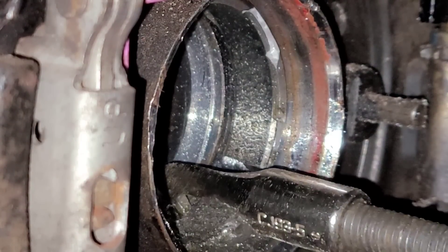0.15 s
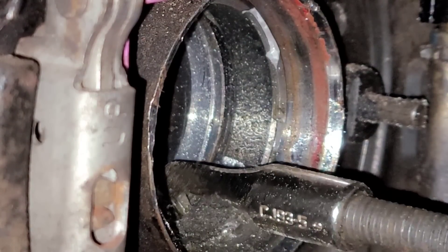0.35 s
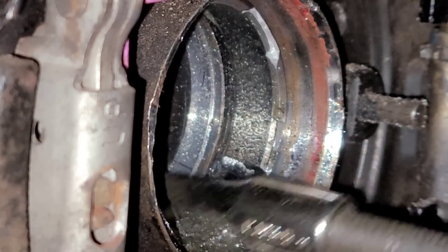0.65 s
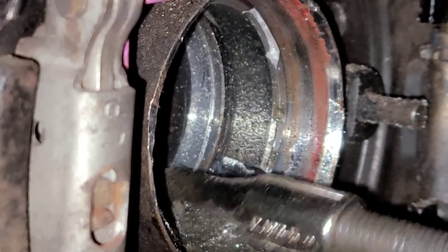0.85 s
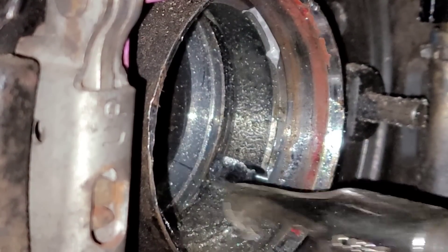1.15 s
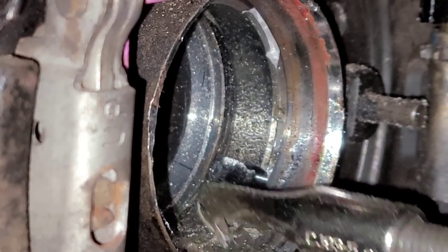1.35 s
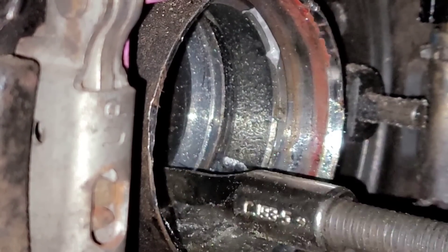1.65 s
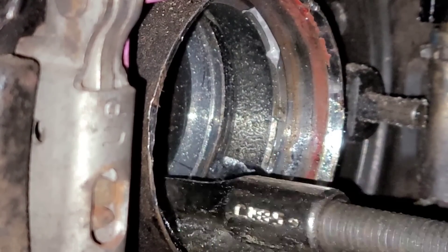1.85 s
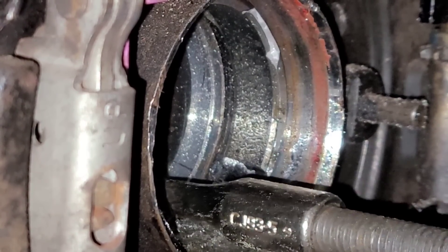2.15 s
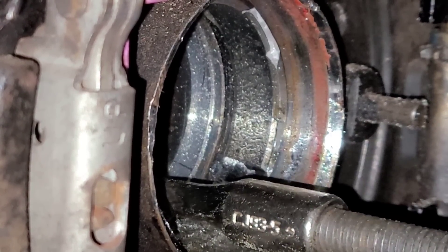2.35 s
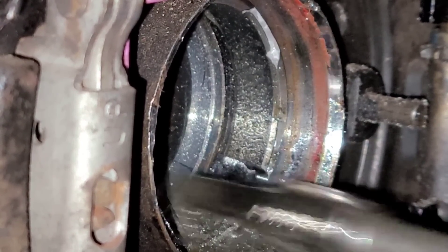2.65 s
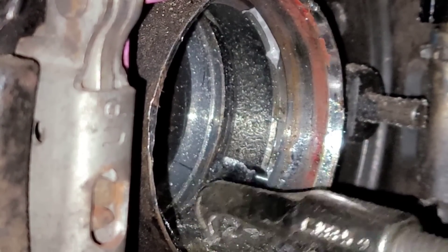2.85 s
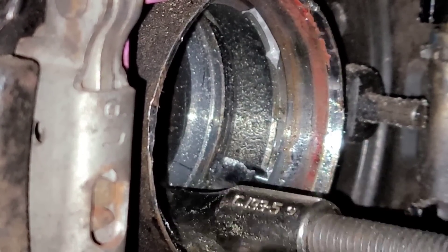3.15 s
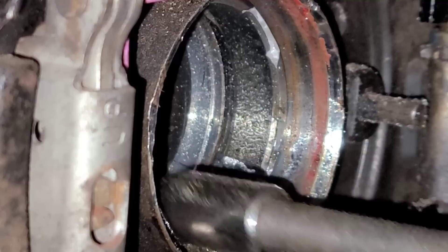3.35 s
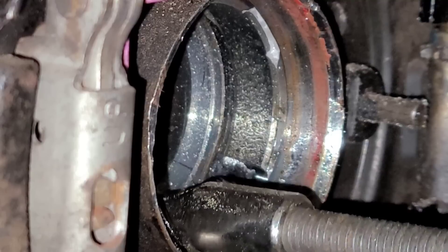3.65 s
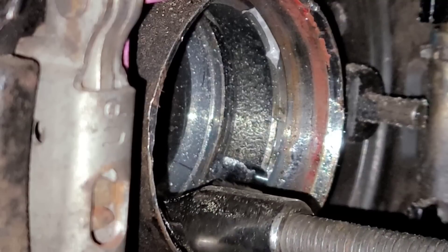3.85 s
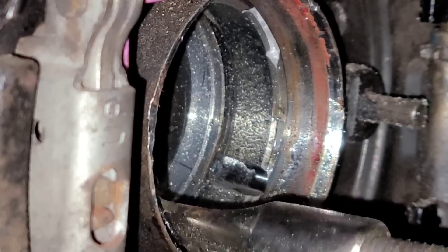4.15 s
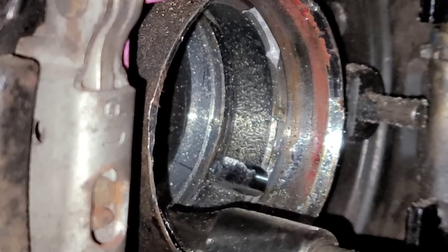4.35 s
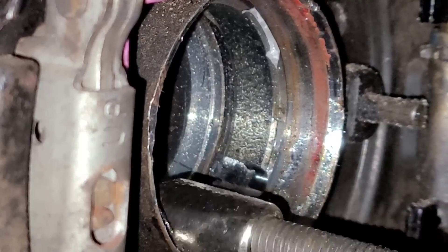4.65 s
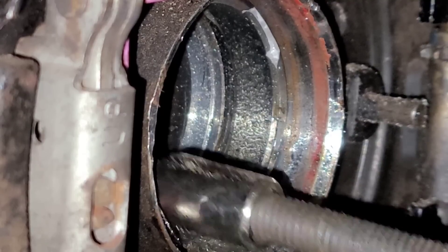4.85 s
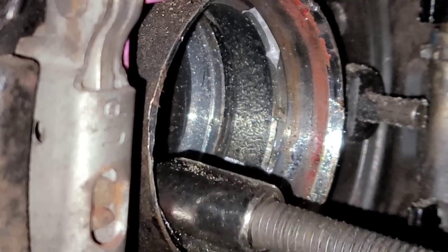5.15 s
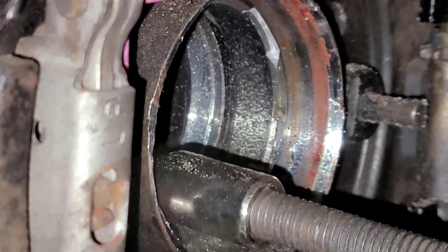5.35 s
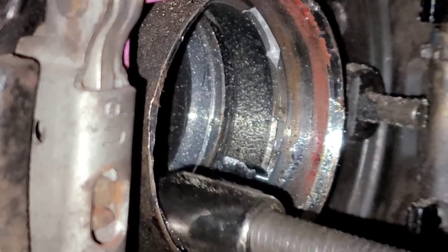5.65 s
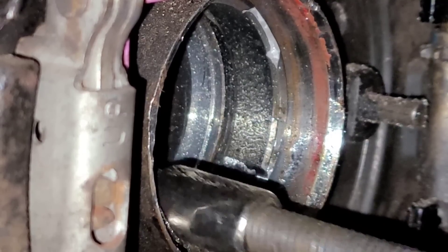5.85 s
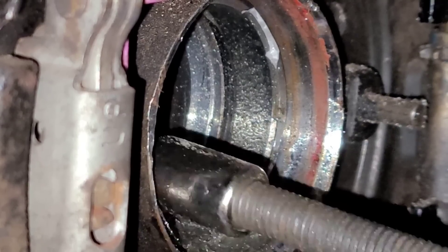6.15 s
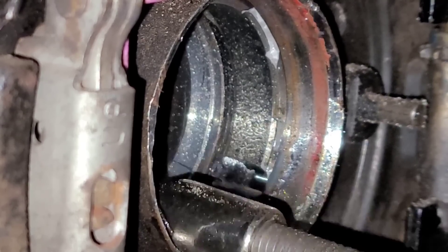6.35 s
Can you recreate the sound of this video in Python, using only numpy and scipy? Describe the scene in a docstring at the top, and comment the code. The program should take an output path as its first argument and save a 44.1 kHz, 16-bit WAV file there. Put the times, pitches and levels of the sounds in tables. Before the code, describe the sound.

In a garage, close to a stereo microphone, a small slide hammer jerks at a stuck bearing over low room rumble and fine hiss. A short scrape at 0.3 s and a loose knock at 0.5 lead to a hard, bright steel clack at 0.6, then another at 1.0. Each has a quick rushing swell before it, a tiny chattering rebound, a shimmering ring under a second long and a faint low boom. From 1.2 to 2.5 the hook ticks and knocks in the bore while the weight rasps along the shaft. A third clack hits at 2.7, followed by lighter scrapes and taps. The fourth, at 4.2, has little boom; small knocks cluster around 4.6. A single sharp clink at 5.3 precedes a crisp clack at 5.7 and the hardest, shortest at 6.1. A bright tap follows at 6.2, then two small knocks at 6.4.

```python
"""Slide hammer on a seized wheel bearing

A slide hammer hooked behind the bearing is jerked six times in a garage, close to the microphone.
A noise swell with faint steel tones leads into each blow's noise burst; hub tones ring, low modes boom and rock.
Filtered noise scrapes the weight along the shaft, knocks the loose hook in its bore and clinks it once.
Room rumble and a fine hiss lie underneath."""
import sys
import numpy as np
from scipy import signal
from scipy.fft import rfft, irfft, next_fast_len
from scipy.io import wavfile
from scipy.ndimage import uniform_filter1d, map_coordinates

SR = 44100
rng = np.random.default_rng(int(sys.argv[2]) if len(sys.argv) > 2 else 0)


def int16_out(signal):
    """Quantize to a 16-bit WAV file."""
    q = np.round(np.clip(np.atleast_2d(signal).T, -1, 1) * 32767)
    wavfile.write(sys.argv[1], SR, q.astype(np.int16))


N = 286209
T = np.arange(N) / SR


def undb(db):
    """Decibels to gain."""
    return 10 ** (np.asarray(db) / 20)


def unit(x):
    """Scale each channel to rms 1."""
    return x / np.sqrt(np.mean(x ** 2, axis=-1, keepdims=True))


def noise(seconds):
    """Unrelated white noise for the two ports, with its time axis."""
    t = T[:int(seconds * SR)]
    return t, rng.standard_normal((2, len(t)))


def fade(t, t60):
    """Exponential decay by 60 dB in t60 seconds."""
    return np.exp(-np.log(1000) * t / t60)


def jitter(t, rate):
    """Random values of spread 1, joined by straight lines, at the given rate per second."""
    knots = np.arange(0, t[-1] + 1 / rate, 1 / rate)
    return np.interp(t, knots, rng.standard_normal(256)[:len(knots)])


def colour(x, points, ripple_db=0):
    """Causal filter of unit power gain through (Hz, dB) points; crowded modes ripple it."""
    size = 2 * next_fast_len(x.shape[-1] // 2 + 1024)
    hz, db = np.transpose(points)
    bins = np.fft.rfftfreq(size, 1 / SR) + 1
    grid = np.arange(0, SR / 2, 110)
    ripple = np.array([np.interp(bins, grid, row) for row in rng.standard_normal((2, len(grid)))])
    crowding = bins / (bins + 1200)  # modes crowd towards the treble
    curve = np.interp(np.log(bins), np.log(hz), db)
    gain = unit(undb(curve + ripple_db * ripple * crowding))
    # Folding the cepstrum gives minimum phase, so nothing sounds ahead of its cause.
    cepstrum = irfft(np.log(gain))
    cepstrum[:, 1:size // 2] *= 2
    cepstrum[:, size // 2 + 1:] = 0
    return irfft(rfft(x, size) * np.exp(rfft(cepstrum)))[:, :x.shape[-1]]


def resonate(x, hz, width_hz):
    """One resonance that keeps the power of white noise."""
    peak = signal.iirpeak(hz, hz / width_hz, SR)
    return signal.lfilter(*peak, x) * np.sqrt(SR / np.pi / width_hz)


def clang(modes, t, width_hz):
    """Clusters of close modes, as narrow noise bands, that beat unevenly as they die."""
    grit = rng.standard_normal((2, 2 * len(t)))
    out = 0
    for hz, db, t60 in modes:
        settled = resonate(grit, hz, width_hz)[:, len(t):]  # skip the filter's build-up
        out = out + undb(db) * settled * fade(t, t60)
    return out


def ring(modes, seconds, scatter_db, spread):
    """Decaying sines; each blow weights them anew and each port hears its own phase."""
    t, out = T[:int(seconds * SR)], 0
    for hz, db, t60 in modes:
        phase = spread * rng.choice([-1, 1]) * np.array([[1], [-1]])
        level = undb(db + scatter_db * rng.standard_normal())
        out = out - level * fade(t, t60) * np.sin(2 * np.pi * hz * t + phase)
    return out


def pan(x, db):
    """Tilt the level towards the left port."""
    return x * undb(np.array([[db], [-db]]) / 2)


def add(track, s, x):
    """Mix a sound in at time s."""
    start = int(s * SR)
    track[:, start:start + x.shape[1]] += x[:, :N - start]


# Room tone spectrum. Each row: frequency in Hz, relative level in dB per Hz.
ROOM_COLOUR = [(12, -29), (20, -13), (38, -2.5), (96, -1.5), (262, -12.5), (357, -21), (499, -33.5),
               (1030, -41), (1440, -43), (1900, -43.5), (2600, -45.5), (5000, -53.5), (6400, -47.5),
               (7800, -53.5), (9300, -39), (10300, -45), (11800, -42), (12600, -34.5), (14000, -38),
               (16000, -37)]
# The hiss sinks and swells. Each row: time in seconds, relative level in dB.
HISS_LEVEL = [(0, 13), (.5, 14), (2, 4.5), (2.5, 12.5), (3.7, 5), (6.4, 6.5)]
ROOM_DB = -62.5


def garage(hiss_db):
    """Low room rumble, about half of its power shared by both ports, under a fine unshared hiss."""
    air = rng.standard_normal((3, N))
    low_pass = signal.butter(2, 600, fs=SR, output="sos")
    high_pass = signal.butter(2, 600, "high", fs=SR, output="sos")
    rumble = signal.sosfilt(low_pass, colour(air[:2] + air[2] * 1.08, ROOM_COLOUR))
    hiss = signal.sosfilt(high_pass, colour(air[:2], ROOM_COLOUR))
    drift_db = np.interp(T, *np.transpose(HISS_LEVEL))
    return undb(ROOM_DB) * (rumble + hiss * undb(hiss_db + drift_db))


# The shaft's resonances wander as the weight moves: spread as a share of pitch, random values per second.
WANDER, WANDER_RATE = 0.04, 11


def wander(x):
    """Bend all resonances of a sound up and down together by varying its playback speed."""
    place = np.cumsum(1 + WANDER * jitter(T[:x.shape[1]], WANDER_RATE))
    return np.array([map_coordinates(port, [place], mode="mirror") for port in x])


# The weight is drawn along the shaft.
# Each row: loudest moment in seconds, time from there to 1/e of the level in seconds, level in dB.
RUBS = [(0.045, 0.034, -59), (0.267, 0.052, -45.5), (1.365, 0.025, -49.5), (1.483, 0.053, -53),
        (1.687, 0.024, -48), (2.252, 0.036, -55), (2.454, 0.055, -47.5), (2.86, 0.037, -42.5),
        (3.156, 0.028, -51), (3.462, 0.028, -60.5), (4.61, 0.14, -58)]
# Resonances of the rubbed shaft, before each rub detunes and widens them.
# Each row: frequency in Hz, width in Hz, relative level in dB.
SHAFT = [(570, 30, -11.5), (1980, 16, 0.5), (2610, 31, -12), (3650, 87, -17), (4610, 43, -17.5),
         (6800, 150, -16), (8000, 36, -32.5), (9200, 160, -17.5), (8600, 450, -19), (11100, 66, -21),
         (11600, 82, -16)]
# Spectral tilt of a rub. Each row: frequency in Hz, relative level in dB per Hz.
RUB_TILT = [(200, -18.5), (550, 1.5), (1200, -11.5), (1800, 3), (5000, -4), (8000, -9.5)]
# The slide ahead of each blow: loudest this long before it, and time to 1/e, in seconds.
SLIDE_LEAD_S, SLIDE_HALF_S = 0.105, 0.074
# A rub catches and frees unevenly: level spread in dB, random values per second, widening by the grip in Hz.
CATCH_DB, CATCH_RATE, GRIP_HZ = 3.5, 70, 120


def scrape(grain_db, hiss_db, hollow_db):
    """The weight drags over the shaft; grainy noise rings the shaft and the hollow hub."""
    out = np.zeros((2, N))
    slides = [(s - SLIDE_LEAD_S, SLIDE_HALF_S, db) for s, db, *_ in BLOWS]
    for s, half, db in slides + RUBS:
        t, grit = noise(.4)
        grain = unit(uniform_filter1d(rng.standard_normal(len(t)), size=100))
        grit = grit * undb(grain_db * grain + CATCH_DB * jitter(t, CATCH_RATE))
        tones = 0
        for hz, width, gain in SHAFT:
            tone = resonate(grit, hz * rng.uniform(.92, 1.0), width + GRIP_HZ)
            tones = tones + undb(gain) * tone * np.sqrt(width)
        hollow = undb(hollow_db) * unit(resonate(resonate(grit, 690, 520), 690, 520))
        blend = unit(tones) + undb(hiss_db) * unit(grit) + hollow
        sound = unit(colour(blend, RUB_TILT, ripple_db=4))
        start = max(s - t[-1] / 2, 0)
        swell = np.exp(-((t + start - s) / half) ** 2)
        add(out, start, pan(undb(db) * wander(sound) * swell, -1.3))
    return out


# Hook knocks in the bore.
# Each row: start in seconds, bright edge in dB, body in dB, hollow low note in dB.
KNOCKS = [(0.5206, -33.5, -23, -41), (1.234, -32, -37, -63), (1.278, -37.5, -45, -64),
          (1.4476, -73, -45.5, -63), (1.5625, -37.5, -48, -66), (1.6186, -38, -47, -70),
          (1.674, -62, -38, -70), (1.9486, -67.5, -46, -32.5), (2.2172, -66, -44, -57.5),
          (3.168, -40, -50.5, -71), (3.3464, -63, -46, -75.5), (3.644, -57.5, -63, -63.5),
          (4.0562, -48.5, -48.5, -63.5), (4.5161, -53, -40, -60), (4.5516, -56, -43.5, -46),
          (4.5862, -70, -50, -53), (4.6912, -48, -37.5, -52), (5.1294, -57.5, -67, -63),
          (5.542, -65, -43.5, -75), (6.0293, -46.5, -36.5, -37), (6.1996, -19, -29, -64),
          (6.3853, -37, -32, -57), (6.4073, -38.5, -36, -68)]
# Bright edge spectrum. Each row: frequency in Hz, relative level in dB per Hz.
EDGE = [(200, 0), (700, -8.5), (1500, -10.5), (3300, 1), (5000, -2.5), (6700, 0), (7700, -2), (10000, 1.5),
        (14000, -2), (16000, -2)]
# The body note depends on how the hook sits: before and after the blow that reseats it.
SEAT_HZ, RESEATED_HZ, RESEATED_S = 1861, 2284, 4.2


def knocks(edge_t60, body_t60, tail_db, tail_t60):
    """The loose hook taps the bore: a body note and a hollow low note under a bright edge, with a tail."""
    out = np.zeros((2, N))
    for s, edge_db, body_db, hollow_db in KNOCKS:
        hz = SEAT_HZ if s < RESEATED_S else RESEATED_HZ
        t, grit = noise(.35)
        tail = undb(tail_db) * fade(t, tail_t60)
        soft_onset = 1 - np.exp(-t / 0.00066)
        push = grit * (fade(t, body_t60) + tail) * soft_onset
        note = [(hz / 2, -24), (hz * 0.78, -12), (hz, 0), (hz * 1.33, -14), (hz * 2, -22), (hz * 4, -40)]
        body = colour(push, note, ripple_db=3.5)
        hollow = resonate(resonate(push, 610, 300), 610, 300) / np.sqrt(SR / 300)
        # The ports swap noise, so edge and body stay unrelated within each port.
        edge = colour(grit[::-1] * (fade(t, edge_t60) + tail / 2), EDGE, ripple_db=3.5)
        add(out, s, undb(body_db) * body + undb(hollow_db) * hollow + pan(undb(edge_db) * edge, 1.2))
    return out


# The hook hits the race. The pair: time in seconds, level in dB.
CLINK = (5.3275, -7)
# Swell and crack spectrum. Each row: frequency in Hz, relative level in dB per Hz.
CLINK_COLOUR = [(180, -66), (300, -31), (1660, -28.5), (2100, -7.5), (2740, -23.5), (3290, -9), (3830, -24),
                (5080, -18.5), (5700, -13), (7570, -27), (10600, -17.5), (11700, -3.5), (13100, -9.5),
                (14200, -9), (16000, -35.5)]
# Mode clusters of the free hook. Each row: frequency in Hz, relative level in dB, t60 in seconds.
CLINK_MODES = [(2150, 4.5, 0.29), (3410, -2.5, 0.49), (5590, -5, 0.6), (6720, -6.5, 0.43),
               (11400, -7, 0.52), (14300, 1, .24)]
# Short diffuse tail relative to the crack, and gain of the free ring.
CLINK_TAIL_DB, CLINK_RING_DB = -17.5, -43.5


def clink(crack_t60, tail_db, tail_t60, modes_db):
    """A short noise swell leads into one hard contact, which leaves the hook ringing freely."""
    out, (s, db) = np.zeros((2, N)), CLINK
    t, grit = noise(.6)
    crack = fade(np.maximum(t - .0015, 0), crack_t60)
    shape = crack + undb(tail_db) * fade(t, tail_t60)
    swell = undb(-25) * grit[::-1] * fade(t[::-1], 0.029)
    contact = colour(np.hstack([swell, grit * shape]), CLINK_COLOUR, ripple_db=1.5)
    add(out, s - len(t) / SR, undb(db) * contact)
    add(out, s, undb(modes_db) * clang(CLINK_MODES, t, width_hz=110))
    return out


# Suspension and dust shield modes. Each row: frequency in Hz, relative level in dB, t60 in seconds.
BOOM_MODES = [(76.7, -16.5, 4.2), (165.3, -23.5, 9.1), (206, 3, 0.47), (214, -21, 4.9), (246, -4, 0.65),
              (279, -8, .3), (296, -21, 2.7), (384, -11.5, 0.59), (502, -15, 1), (698, -10, 0.17),
              (822, -11.5, 0.36)]
# Spectrum of the dense low wash. Each row: frequency in Hz, relative level in dB per Hz.
BOOM_COLOUR = [(40, -2), (85, -8), (130, -4.5), (230, 1.5), (330, -6), (480, -3), (800, -16), (1100, -17.5),
               (2500, -37.5)]


def boom(build_s, wash_db, wash_t60):
    """The shock spreads into suspension and bodywork, whose low modes build up late."""
    t, dense = noise(2)
    decay = fade(t, wash_t60) + undb(-23.5) * fade(t, 2.4)
    wash = undb(wash_db) * colour(dense * decay, BOOM_COLOUR, ripple_db=6)
    modes = ring(BOOM_MODES, seconds=2, scatter_db=2.0, spread=0.23)
    return (wash + modes) * (1 - np.exp(-(t / build_s) ** 2))


# Clusters of close tool and hub modes.
# Each row: frequency in Hz, relative level in dB, t60 of the struck ring in seconds.
STEEL_MODES = [(1850, -4.5, 0.49), (2710, -11, 0.34), (3144, 2, .35), (4230, -8, 0.28), (6220, -8, 0.89),
               (6740, -10, 0.71), (8140, -10.5, 0.87), (10830, -2.5, 0.23), (11560, -1.5, 0.41),
               (11000, -9, 0.34), (12230, -9, 0.34), (11890, -1, 0.5), (13750, 1.5, 0.49), (14000, 4, .45),
               (13545, -8.5, .45), (13670, -2.5, .45), (13170, 0, 0.53), (15600, 0, .35), (15800, 7.5, .35)]
# Dense hub ring spectrum. Each row: frequency in Hz, relative level in dB per Hz.
RING_COLOUR = [(100, -15.5), (400, -12.5), (800, -8), (1300, -10.5), (2000, -3), (3200, 1), (5000, -2.5),
               (6400, -0.5), (7600, -2.5), (10800, -0.5), (12300, -2.5), (13500, 2.5), (15700, -6.5)]


def ring_out(hook_hz, early_t60, late_t60, late_db, modes_db, hook_db):
    """Countless hub modes die fast, the garage holds them longer, the hook and some steel tones stand out."""
    t, dense = noise(.9)
    dense = dense * (fade(t, early_t60) + undb(late_db) * fade(t, late_t60))
    hook = undb(hook_db) * resonate(dense, hook_hz, 250)
    steel = undb(modes_db) * clang(STEEL_MODES, t, width_hz=7.6)
    return colour(dense, RING_COLOUR, ripple_db=4.5) + hook + steel


# Spectrum of the swell into a blow. Each row: frequency in Hz, relative level in dB per Hz.
LEAD_IN_COLOUR = [(60, -4), (350, -4), (1100, -4), (2000, -1), (3200, 1), (5000, -8), (7500, -8.5),
                  (9000, -4), (12000, -8), (13800, -11), (15700, 3)]


def lead_in(hook_hz, rise_t60, hook_db, modes_db):
    """A noise swell with faint steel tones rises into the blow and stops at the impact."""
    t, grit = noise(.08)
    swell = grit * np.tanh(2.4 * fade(t[::-1], rise_t60))
    tones = sum(undb(db) * resonate(swell, hz, 83) for hz, db, _ in STEEL_MODES)
    hook = undb(hook_db) * resonate(swell, hook_hz, 700)
    return colour(swell, LEAD_IN_COLOUR, ripple_db=12.0) + hook + undb(modes_db) * tones


# Steel on steel spectrum. Each row: frequency in Hz, relative level in dB per Hz.
IMPACT_COLOUR = [(60, -12), (350, 5.5), (900, -0.5), (1600, -9), (3200, 0.5), (5000, -7), (7500, -4),
                 (10000, -2), (12300, 1.5), (13500, 5), (15700, -8.5)]


def impact(length, hook_hz, t60, hook_db):
    """Steel chatter as a noise burst that holds for half its length, then dies, and excites the hook."""
    t, grit = noise(.06)
    burst = grit * fade(np.maximum(t - length / 2, 0), t60)
    steel = colour(burst, IMPACT_COLOUR, ripple_db=4.5)
    return steel + undb(hook_db) * resonate(burst, hook_hz, 450)


# Hammer blows. Each row: impact time in seconds, slide in dB, lead-in swell in dB, impact in dB, boom in dB,
# rocking in dB, chatter length in seconds, hook resonance in Hz, left minus right of swell and impact in dB.
BLOWS = [(0.5761, -51, -10.5, -10.5, -34.5, -44, 0.0052, 10740, 2.5),
         (1.0000, -56, -9, -12.5, -32.5, -34.5, 0.0073, 11100, -0.5),
         (2.7447, -48.5, -5.5, -11.5, -40, -31.5, 0.0072, 10700, 1),
         (4.1954, -56.5, -15, -12, -57, -39, 0.008, 10800, 0),
         (5.7004, -65, -22, -8, -40.5, -33, 0.0039, 11300, 1.5),
         (6.0841, -55.5, -16, -4, -36.5, -47, 0.002, 11870, 0.5)]
# The whole corner of the car rocks. Each row: frequency in Hz, relative level in dB, t60 in seconds.
ROCK_MODES = [(26.7, 7.5, 0.2), (45.8, 3, 0.24), (70, 5, 0.23)]
# The weight grazes its stop one chatter length early, at a level relative to the lead-in swell.
GRAZE_DB = -9
# It bounces back once, at a level relative to the impact.
REBOUND_S, REBOUND_DB = 0.007, -12.5
# Every blow leaves the hub ringing about equally; the steel tones are set relative to that ring.
RING_DB, STEEL_DB = -29, -12.5


def hammer():
    """Each stroke: lead-in swell, graze, impact and rebound; then ring, boom and rocking."""
    out = np.zeros((2, N))
    for s, _, swell_db, hit_db, boom_db, rock_db, length, hook_hz, pan_db in BLOWS:
        swell = lead_in(hook_hz, rise_t60=0.06, hook_db=-22.5, modes_db=-20.5)
        add(out, s - swell.shape[1] / SR, pan(undb(swell_db) * swell, pan_db))
        hit = impact(length, hook_hz, t60=0.021, hook_db=-6)
        add(out, s, pan(undb(hit_db) * hit, pan_db))
        graze = (s - length, swell_db + GRAZE_DB)
        rebound = (s + REBOUND_S, hit_db + REBOUND_DB)
        for when, db in [graze, rebound]:
            touch = impact(0.00094, 13600, t60=0.022, hook_db=3.5)
            add(out, when, pan(undb(db) * touch, 2.7))
        tail = ring_out(hook_hz, early_t60=0.26, late_t60=0.64, late_db=-2.5, modes_db=STEEL_DB, hook_db=-13.0)
        add(out, s, pan(undb(RING_DB) * tail, 1.0))
        low = boom(build_s=0.025, wash_db=7, wash_t60=0.34)
        add(out, s, pan(undb(boom_db) * low, -5.0))
        rocking = ring(ROCK_MODES, seconds=.5, scatter_db=2, spread=0.48)
        add(out, s, pan(undb(rock_db) * rocking, 6))
    return out


def scene():
    """All sounds of the job together."""
    room = garage(hiss_db=10)
    rubs = scrape(grain_db=2.5, hiss_db=-12, hollow_db=-6.5)
    taps = knocks(edge_t60=0.031, body_t60=0.037, tail_db=-15.5, tail_t60=.3)
    contact = clink(crack_t60=0.01, tail_db=CLINK_TAIL_DB, tail_t60=0.16, modes_db=CLINK_RING_DB)
    return room + rubs + taps + contact + hammer()


TOP_HZ = 15850


def record(dry):
    """The right port favours the mids, the left the treble; high peaks are rounded and the top is cut."""
    mids = signal.lfilter(*signal.butter(1, [900, 3000], "band", fs=SR), dry)
    treble = signal.lfilter(*signal.butter(1, 12000, "high", fs=SR), dry)
    ports = dry - mids - treble + pan(mids, -2.5) + pan(treble, 2.5)
    top_cut = signal.ellip(12, .2, 85, TOP_HZ, fs=SR, output="sos")
    return signal.sosfilt(top_cut, np.tanh(ports))


dry = scene()
out = record(dry)
int16_out(out)
```